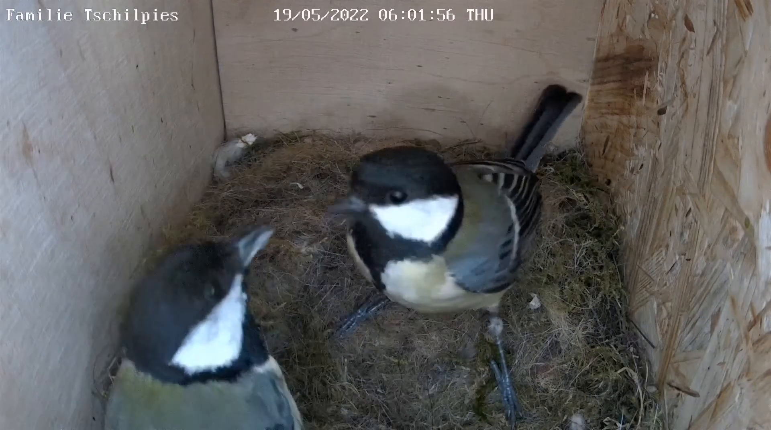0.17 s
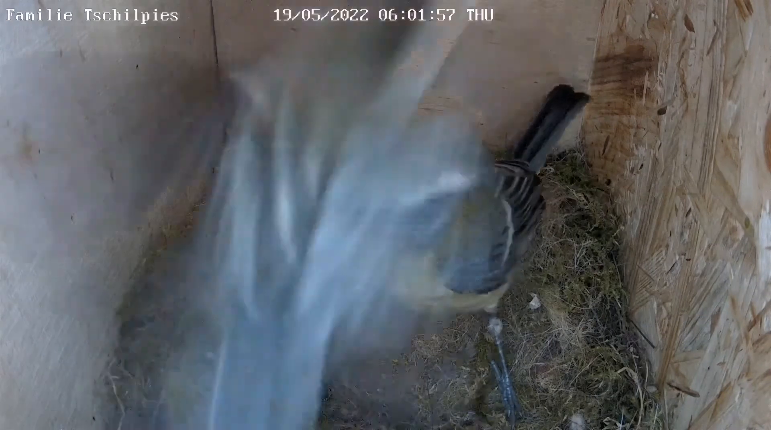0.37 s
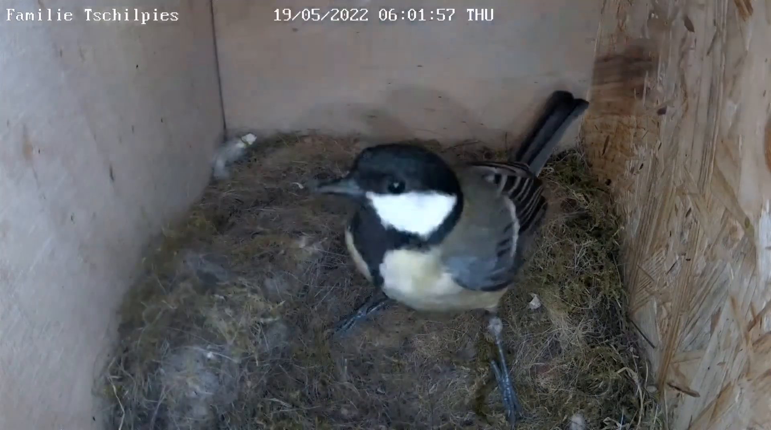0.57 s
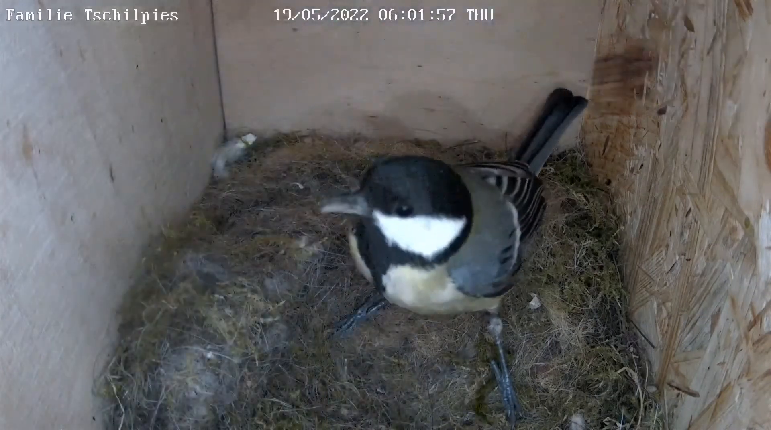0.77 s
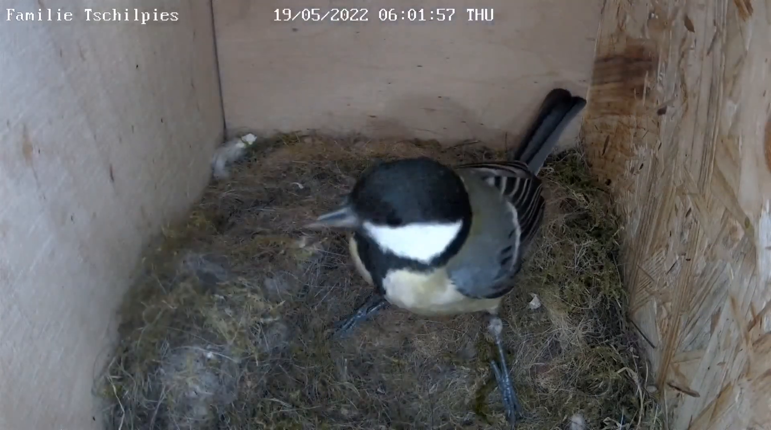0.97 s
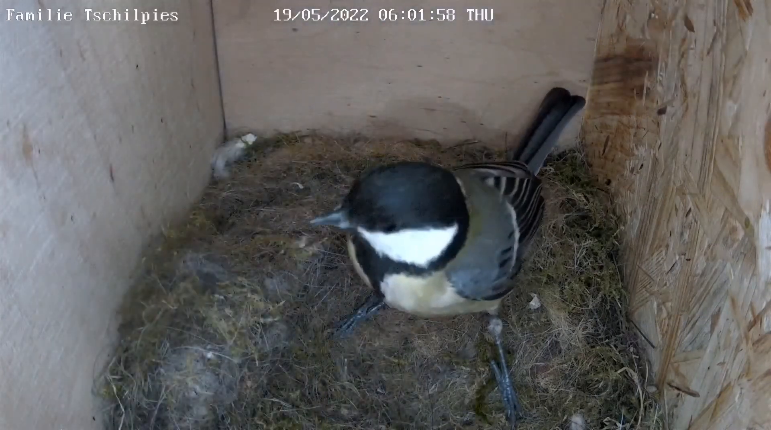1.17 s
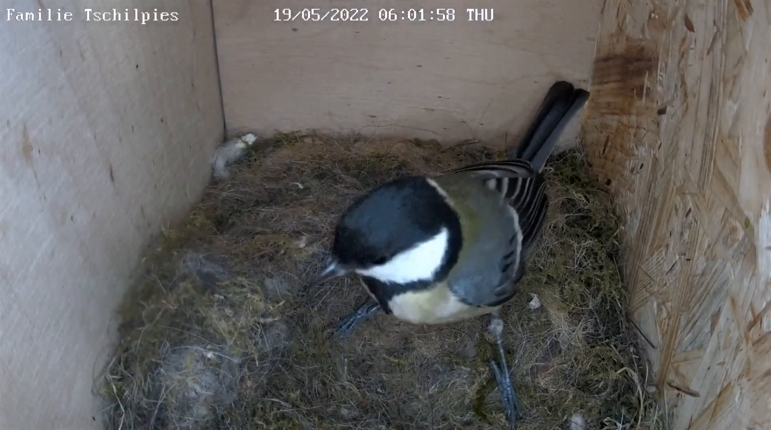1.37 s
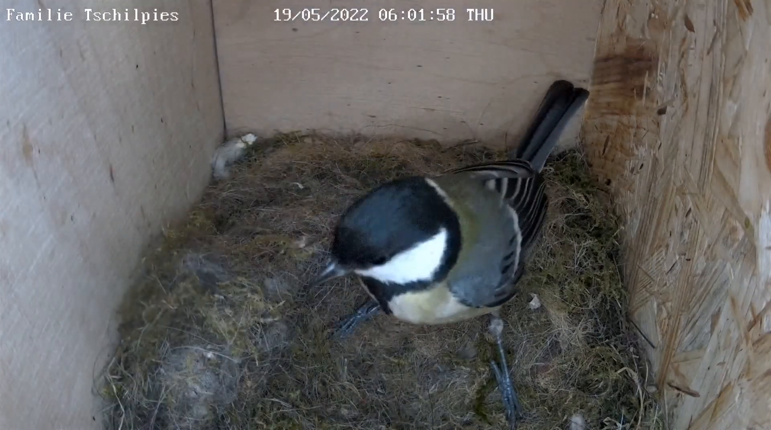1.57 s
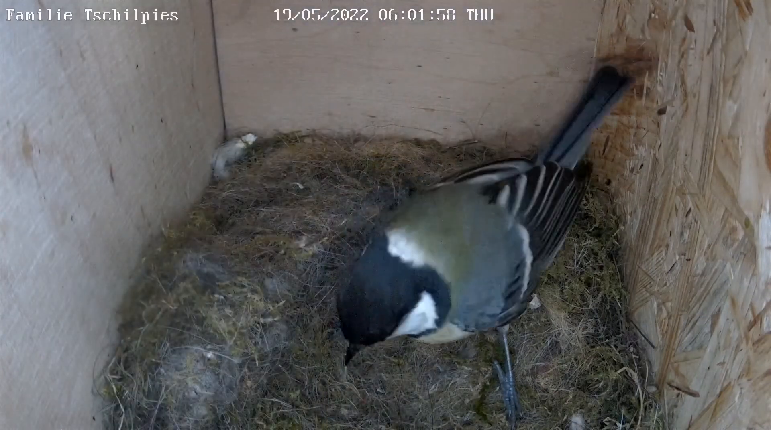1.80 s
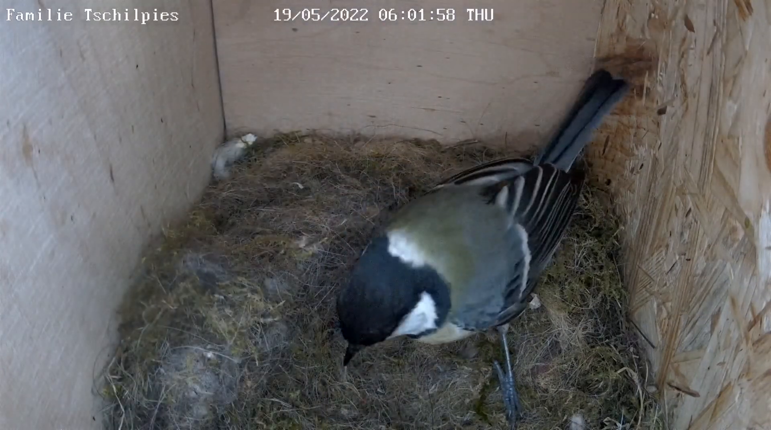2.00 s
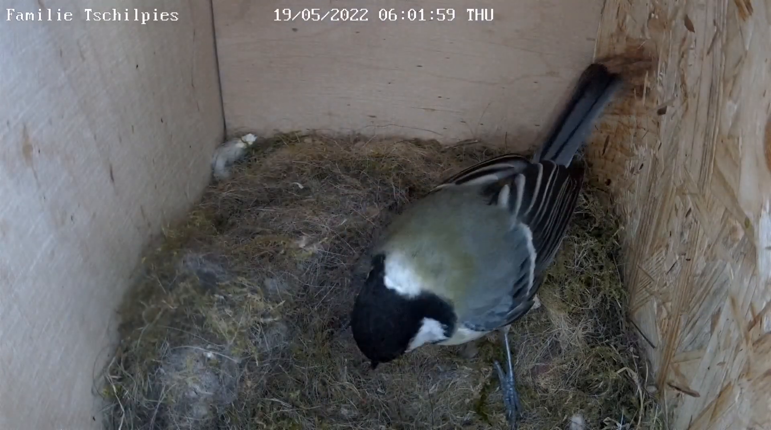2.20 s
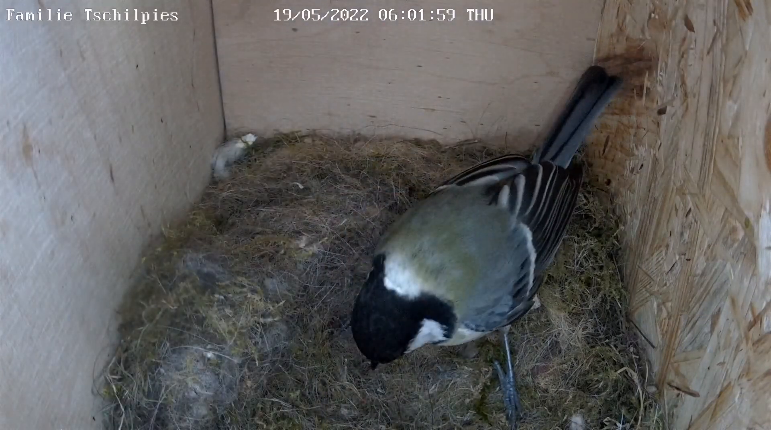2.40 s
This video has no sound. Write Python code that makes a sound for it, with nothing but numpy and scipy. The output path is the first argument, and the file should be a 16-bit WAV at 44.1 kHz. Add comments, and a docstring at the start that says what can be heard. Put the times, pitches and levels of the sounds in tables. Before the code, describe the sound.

Small bird chatters six harsh raspy notes in a wooden box, then thumps and scuffs

```python
"""Great tits chattering in a nest box

Two birds in a wooden box, close to a small microphone. One gives six harsh notes: gliding tones
chopped by irregular pulses and roughened by noise, coloured by the beak and the air in the box.
Then one leaves: its body bumps the box (pulses ringing wood modes), and claws and feathers scuff
the walls (strokes of grainy noise). Shaped noise makes a soft wash, a low rumble, faint high rustles
and a steady hiss; sines make a thin whine. Rumble and rustles remain at the end."""
import sys
import numpy as np
from scipy import signal
from scipy.fft import rfft, irfft, next_fast_len
from scipy.io import wavfile
from scipy.ndimage import map_coordinates

SR = 44100
rng = np.random.default_rng(int(sys.argv[2]) if len(sys.argv) > 2 else 0)


def master(y):
    """Save y as 16-bit WAV."""
    cut = np.clip(np.atleast_2d(y).T, -1, 1)
    pcm = np.round(cut * 32767)  # scale
    wavfile.write(sys.argv[1], SR, pcm.astype(np.int16))


N = 108045
TIME_S = np.arange(N) / SR


def amp(db):
    """Decibels to gain."""
    return 10 ** (np.asarray(db) / 20)


def unit(x):
    """Scale to rms 1."""
    return x / np.sqrt(np.mean(x ** 2) + 1e-20)


def colour(points, hz):
    """Gain of (freq_hz, gain_db) points on a log axis."""
    f, db = np.transpose(points)
    return amp(np.interp(np.log(hz + 1), np.log(f + 1), db))


def level(points):
    """Gain over time of (time_s, level_db) points."""
    return amp(np.interp(TIME_S, *np.transpose(points)))


def filtered(x, response):
    """Multiply the spectrum of x by a response of frequency."""
    m = next_fast_len(len(x) + 8192)
    spectrum = rfft(x, m) * response(np.fft.rfftfreq(m, 1 / SR))
    return irfft(spectrum, m)[:len(x)]


def noise(response):
    """Gaussian noise through a response, at rms 1."""
    return unit(filtered(rng.standard_normal(N), response))


def resonances(modes, direct_db, f):
    """Causal response: a direct path plus (freq_hz, width_hz, gain_db) modes."""
    total = amp(direct_db)
    for centre, width, db in modes:
        total = total + amp(db) * 1j * f * width / (centre * centre - f * f + 1j * f * width)
    return total


def band(f, hz, octaves):
    """A bell on the log-frequency axis."""
    return np.exp(-.5 * (np.log2((f + 1) / hz) / octaves) ** 2)


def wobble(rate_hz):
    """Smooth random curve with rate_hz knots a second."""
    knots = rng.standard_normal(int(N * rate_hz / SR) + 4)
    return map_coordinates(knots, [np.arange(N) * rate_hz / SR])


# air resonances of the box: freq_hz, width_hz, gain_db
AIR_MODES = [(510, 60, 10.5), (647.5, 60, 2.5), (1159.6, 78, 4), (1623, 63, 10), (1683, 36, 6),
             (2459, 60, -0.5), (2643, 61, -4), (2935, 100, -0.5), (3170, 66, -3), (3310, 76, 1),
             (3726, 69, 6.5), (4070, 55, 2.5), (4500, 100, -14), (5093, 80, 7), (5650, 59, 0.5)]
# cancellations at the microphone: freq_hz, width_hz
AIR_NULLS = [(340, 290), (880, 282), (1360, 260), (2020, 330), (2700, 80), (3605, 33.6), (3990, 50)]
AIR_DIRECT_DB, NULL_DEPTH = -3.5, .9


def box(f):
    """Air in the box: resonances add to the direct path, nulls cut it."""
    response = resonances(AIR_MODES, AIR_DIRECT_DB, f)
    for hz, width in AIR_NULLS:
        response = response * (1 - NULL_DEPTH * resonances([(hz, width, 0)], -np.inf, f))
    return response


# modes of the wooden box: freq_hz, width_hz, gain_db
WOOD_MODES = [(60.2, 69, -7.5), (129.4, 17, 3.5), (177, 19.3, 2), (290, 15, -18.5), (350.4, 18, -3.5),
              (506, 34, -6), (613, 46, -10), (1090, 87, 4)]
WOOD_DIRECT_DB = -15


def wood(f):
    """Wooden walls: damped modes over a weak direct path."""
    return resonances(WOOD_MODES, WOOD_DIRECT_DB, f)


# hiss spectrum: freq_hz, gain_db
HISS_COLOUR = [(300, -10), (900, -3), (2200, -7.5), (3400, -6.5), (5000, -14), (7000, -7), (8500, -24),
               (15000, -19.5)]
HISS_LEVEL_DB = -82


def hiss():
    """Steady shaped noise."""
    return amp(HISS_LEVEL_DB) * noise(lambda f: colour(HISS_COLOUR, f))


# faint steady tones: freq_hz, level_db
WHINE_TONES = [(5100, -94.5), (5560, -96.5)]


def whine():
    """Thin steady sines."""
    return sum(amp(db) * np.sin(2 * np.pi * hz * TIME_S) for hz, db in WHINE_TONES)


# rumble spectrum: freq_hz, gain_db
RUMBLE_SPECTRUM = [(12, -20.5), (20, 2), (32, -1.5), (81, -12), (97, -9), (123, -0.5), (161, -14.5),
                   (192, -8.5), (218, -34), (252, -22), (406, -47), (440, -38.5), (507, -26), (558, -38),
                   (900, -50.5), (1170, -57), (1980, -120)]
# rumble level: time_s, level_db
RUMBLE_LEVEL = [(0, -47.5), (.3, -46), (.5, -33), (.7, -36), (.78, -39.5), (.9, -32.5), (1.1, -31),
                (1.28, -46), (1.45, -51), (1.9, -56), (2.1, -54), (2.45, -56.5)]


def rumble():
    """Low shaped noise that swells as the birds move."""
    return level(RUMBLE_LEVEL) * noise(lambda f: colour(RUMBLE_SPECTRUM, f))


# faint high rustles: middle_s, length_s, level_db, centre_hz, width_octaves
RUSTLE_EVENTS = [(1.0, 0.049, -69.5, 3740, 0.24), (1.357, 0.26, -74.5, 4030, 0.35),
                 (1.428, 0.1, -67.5, 3450, .08), (1.599, 0.084, -74.5, 3300, 0.058),
                 (1.734, 0.24, -73.5, 3520, 0.12), (2.328, .18, -74.5, 3537, .07),
                 (2.43, 0.07, -75, 3300, 0.059)]


def rustles():
    """Band noise in bell-shaped swells with a fluttering level."""
    out = np.zeros(N)
    for middle, length, db, hz, width in RUSTLE_EVENTS:
        swell = np.exp(-(2 * (TIME_S - middle) / length) ** 2)
        out += amp(db + wobble(100)) * swell * noise(lambda f: band(f, hz, width))
    return out


# breathy rasp spectrum, also used by chatter: freq_hz, gain_db
RASP_COLOUR = [(300, -16.5), (900, -13), (1500, -11), (2200, -7), (3100, -5), (4200, -13.5), (5200, -16),
               (5800, -17.5), (7400, -29.5)]
# voice leaving the beak, also used by chatter: freq_hz, gain_db
BEAK_COLOUR = [(300, -26), (900, -14), (1500, -1), (3000, 0.5), (5000, -1), (5800, -6), (6300, -15.5),
               (6900, -36), (8000, -77)]
# wash level: time_s, level_db
WASH_LEVEL = [(0, -58.5), (0.148, -56), (0.261, -51), (.57, -50.5), (0.678, -67), (.95, -72.5),
              (1.151, -78.5), (1.4, -90)]


def wash():
    """Soft noise in the colours of rasp, beak and box, under the chatter and scuffling."""
    return level(WASH_LEVEL) * noise(lambda f: colour(RASP_COLOUR, f) * colour(BEAK_COLOUR, f) * box(f))


# pushes on the box: time_s, peak_db, push_centre_hz (soft is low)
BUMP_EVENTS = [(.488, -28.5, 241.6), (0.521, -22, 40.3), (0.583, -22.5, 67.2), (.612, -30, 260),
               (0.625, -17, 174), (.642, -12, 204), (0.723, -16, 170), (0.827, -28.5, 170),
               (0.859, -25, 193), (0.939, -51, 104.5), (0.947, -18, 121), (1.015, -17, 53.5),
               (1.038, -17.5, 140.2), (1.058, -15.5, 124.2), (1.08, -25.5, 95), (1.093, -22, 60),
               (1.148, -32.5, 121)]


def bumps():
    """Soft pushes of the bird's body ring the wooden box."""
    out = np.zeros(N)
    for start, db, hz in BUMP_EVENTS:
        u = (np.pi * hz * (TIME_S - start)) ** 2
        push = (1 - 2 * u) * np.exp(-np.minimum(u, 50))
        ring = filtered(push, wood)
        out += amp(db) * ring / np.abs(ring).max()
    return out


GRAINS_HZ = 2410  # mean rate of the large slips


def grains():
    """A dense random stream of tiny slips over a weaker noise."""
    return rng.standard_normal(N) * ((rng.random(N) < GRAINS_HZ / SR) + 0.063)


# claw and feather scuffs: peak_s, rise_s, fall_s, scratch_db, wood_db, scratch_hz, wood_top_hz
SCUFF_EVENTS = [(0.585, 0.0043, 0.026, -51, -37, 3200, 703), (.612, 0.0022, 0.0079, -41, -37.5, 2980, 2500),
                (0.632, 0.0031, 0.012, -41, -36.5, 3360, 2540),
                (0.642, 0.0046, 0.0081, -33.5, -34.5, 3150, 2535),
                (0.721, 0.0055, 0.0086, -54.5, -35.5, 3130, 3000),
                (.742, 0.0041, 0.011, -59, -46, 3660, 1960),
                (0.826, 0.0059, 0.0051, -43.5, -46.5, 3300, 1400),
                (0.856, 0.013, 0.029, -51, -43, 3160, 1560), (.908, 0.0046, .008, -50, -65, 3490, 1500),
                (0.932, 0.0092, 0.01, -44, -36.5, 2980, 1746),
                (1.038, 0.0025, 0.004, -63.5, -49, 2865, 602),
                (1.057, 0.0074, 0.046, -58.5, -42.5, 2840, 800),
                (1.092, 0.0047, 0.0057, -47, -42, 2960, 1010),
                (1.113, 0.0082, 0.0063, -40, -37, 2840, 1190), (1.184, 0.0029, 0.042, -75, -53, 3300, 664)]
# force of a scuff on the wall: freq_hz, gain_db
RUB_COLOUR = [(60, 0), (200, 1), (350, -6), (520, 5.5), (800, -7.5), (1100, -6.5), (1500, -19),
              (2500, -3.5), (6000, -41)]
SCRATCH_WIDTH_OCTAVES, SKIRT_WIDTH_OCTAVES, SKIRT_DB = .19, .93, -26
FLICKER_DB, FLICKER_HZ = 3.5, 160.1  # stick and slip: spread, knots a second


def scuffs():
    """Strokes of tiny slips: a bright scratch through the air and the wall's dull answer."""
    out = np.zeros(N)
    slips = filtered(grains(), box)
    drag = filtered(grains(), lambda f: colour(RUB_COLOUR, f) * wood(f))
    catch = unit(amp(FLICKER_DB * wobble(FLICKER_HZ)))
    for peak, rise, fall, scratch_db, wood_db, hz, top_hz in SCUFF_EVENTS:
        def scratch_band(f):
            """Narrow bell over a broad skirt."""
            skirt = band(f, hz, SKIRT_WIDTH_OCTAVES) / (1 + (f / 6500) ** 16)
            return band(f, hz, SCRATCH_WIDTH_OCTAVES) + amp(SKIRT_DB) * skirt

        stroke = np.exp(-np.maximum((peak - TIME_S) / rise, (TIME_S - peak) / fall))
        scratch = unit(filtered(slips, scratch_band))
        wall = unit(filtered(drag, lambda f: 1 / (1 + (f / top_hz) ** 4)))
        out += stroke * catch * (amp(scratch_db) * scratch + amp(wood_db) * wall)
    return out


# chatter notes: start_s, length_s, level_db, peak_place (0-1), pitch_hz, pitch_rise (fraction),
# treble_db, envelope_power, breath_db
CHATTER_NOTES = [(0.054, 0.096, -27.5, 0.78, 2862, .1, -6.5, 1.53, 2.5),
                 (.168, 0.07, -27.5, 0.35, 2793, .1, -8.5, 0.85, 6.5),
                 (0.262, 0.075, -20, 0.74, 2987, .3, 0.5, 1.1, -2),
                 (0.349, .067, -16.5, 0.66, 3092, .33, 3, 1.04, -4),
                 (.432, 0.067, -15.5, .55, 3100, .42, 1, 0.82, -5.5),
                 (0.485, 0.079, -21, 0.73, 2827, .25, 1, 1.28, -4)]
RASP_HZ, JITTER, SCATTER_DB = 396.6, .18, 1.7  # pulse rate, its log spread, spread of pulse sizes
PULSE_RISE_S, PULSE_DECAY_S = .00025, .0015
SLIP_RAD, WANDER = .8, .04  # phase spread between pulses, pitch unsteadiness (fraction)
DROP, DROP_S = .3, .012  # pitch fall at note end (fraction), its length
TONE_SHARE, OCTAVE_DB = .15, -12.5  # unchopped tone, lower octave
BREATH_GROWTH, DRIVE = .47, .9  # exponent of breath growth, drive into saturation


def chatter():
    """Gliding tone plus breath saturates, is chopped by irregular pulses, then leaves beak and box."""
    out = np.zeros(N)
    cycle = np.cumsum(RASP_HZ * np.exp(JITTER * wobble(400))) / SR
    age_s = cycle % 1 / RASP_HZ
    pulse_size, pulse_slip = rng.standard_normal((4000, 2))[cycle.astype(int)].T
    pulse = (1 - np.exp(-age_s / PULSE_RISE_S)) * np.exp(-age_s / PULSE_DECAY_S)
    gate = unit(pulse * amp(SCATTER_DB * pulse_size))
    drift = WANDER * wobble(300)
    air = noise(lambda f: colour(RASP_COLOUR, f))
    for start, length, db, peak, hz, rise, treble_db, power, breath_db in CHATTER_NOTES:
        end = start + length
        progress = np.clip((TIME_S - start) / length, 0, 1)
        ramp = np.interp(progress, [0, np.clip(peak, .1, .9), 1], [0, 1, 0])
        effort = np.sin(np.pi / 2 * ramp) ** power
        drop = DROP * np.interp(TIME_S, [end - DROP_S, end], [0, 1])
        pitch_hz = hz * (1 + rise * (progress - .5) - drop + drift)
        phase = 2 * np.pi * np.cumsum(pitch_hz) / SR
        rough = phase + SLIP_RAD * pulse_slip
        breath = amp(breath_db) * air * (.5 + progress) ** BREATH_GROWTH
        tone = np.sin(rough) + amp(OCTAVE_DB) * np.sin(rough / 2)
        swing = np.tanh(DRIVE * (tone + breath))
        voice = effort * (gate * swing + TONE_SHARE * np.sin(phase))
        treble = [(3000, 0), (5000, treble_db)]
        note = filtered(voice, lambda f: box(f) * colour(BEAK_COLOUR, f) * colour(treble, f))
        out += amp(db) * note * np.linalg.norm(effort) / np.linalg.norm(note)
    return out


TAIL_S, TAIL_DB = .18, -29  # time to fall 60 dB, level


def lingering(voice):
    """Faint sound around the box: the voice convolved with decaying noise."""
    t = np.arange(SR // 2) / SR
    tail = rng.standard_normal(len(t)) * amp(-60 * t / TAIL_S)
    return amp(TAIL_DB) * signal.fftconvolve(voice, tail / np.linalg.norm(tail))[:N]


def scene():
    """Sum of background, movement and voice with its tail."""
    background = hiss() + whine() + rumble() + rustles()
    movement = wash() + bumps() + scuffs()
    voice = chatter()
    return (background + movement + voice + lingering(voice))[None]


TOP_HZ = 15800


def record(dry):
    """The recorder rolls off the treble and keeps nothing above its band limit."""
    rolloff = [(7000, -0.5), (9000, -4)]
    return filtered(dry[0], lambda f: colour(rolloff, f) * (f < TOP_HZ))[None]


dry = scene()
out = record(dry)
master(out)
```